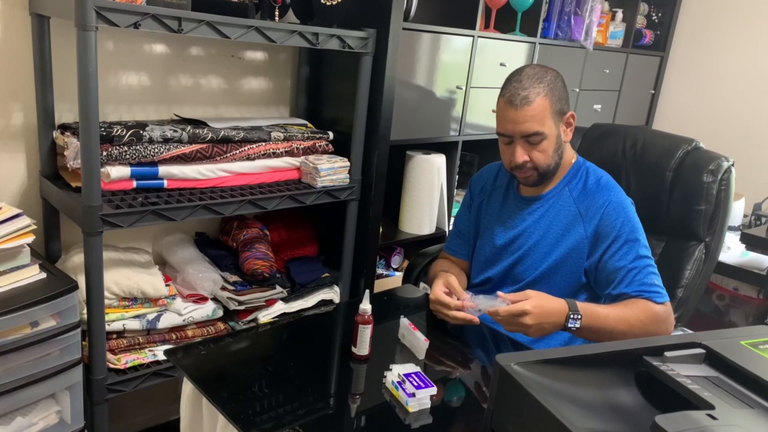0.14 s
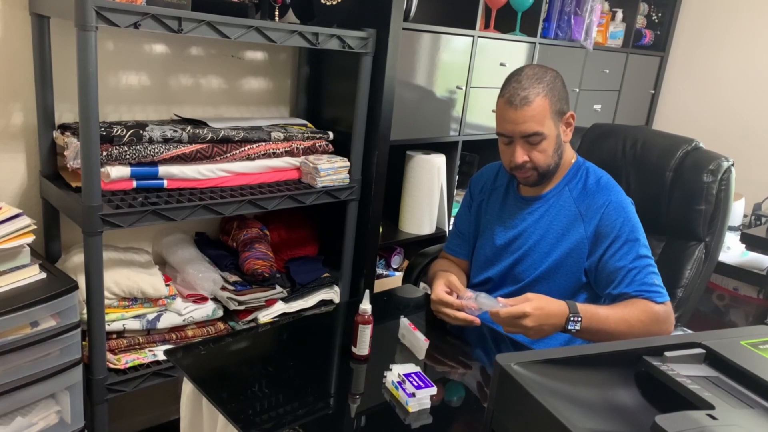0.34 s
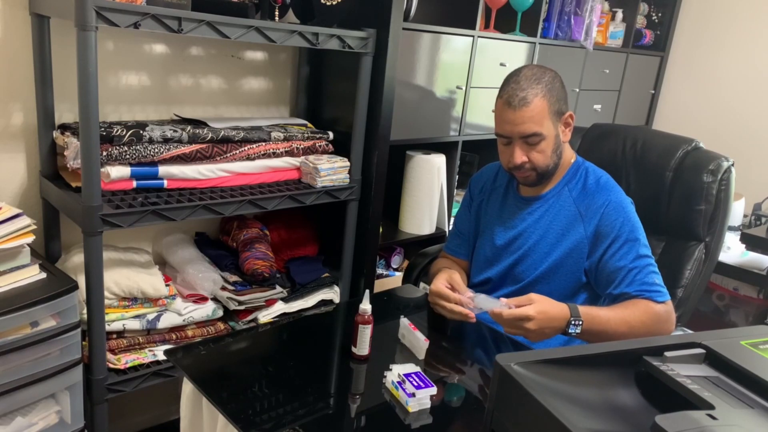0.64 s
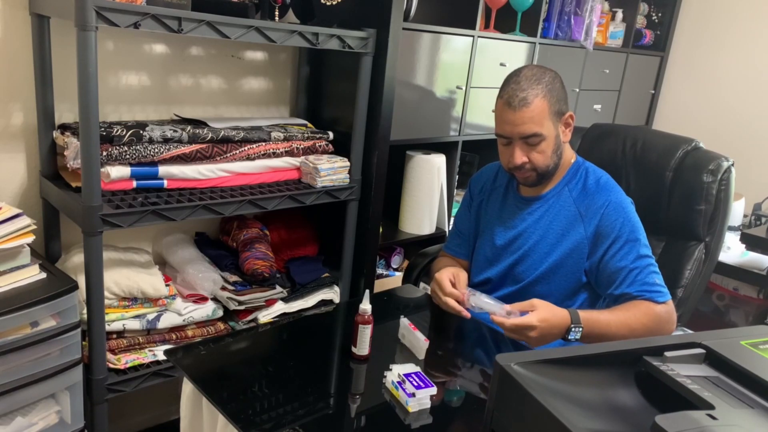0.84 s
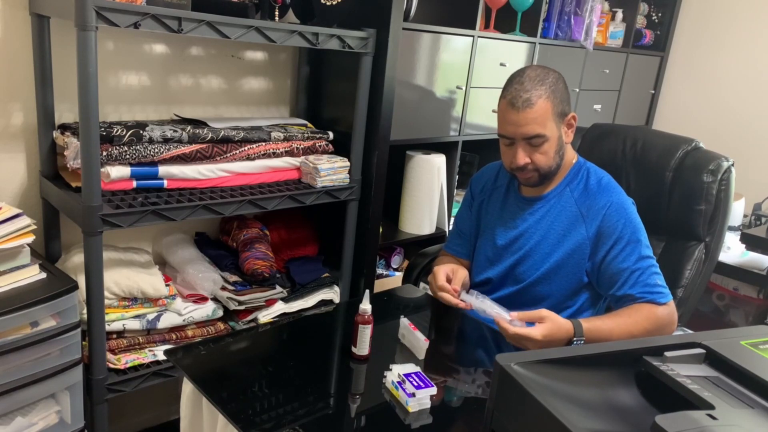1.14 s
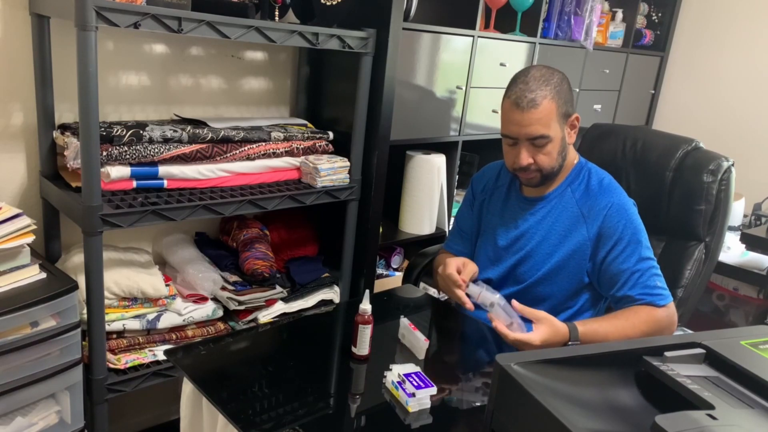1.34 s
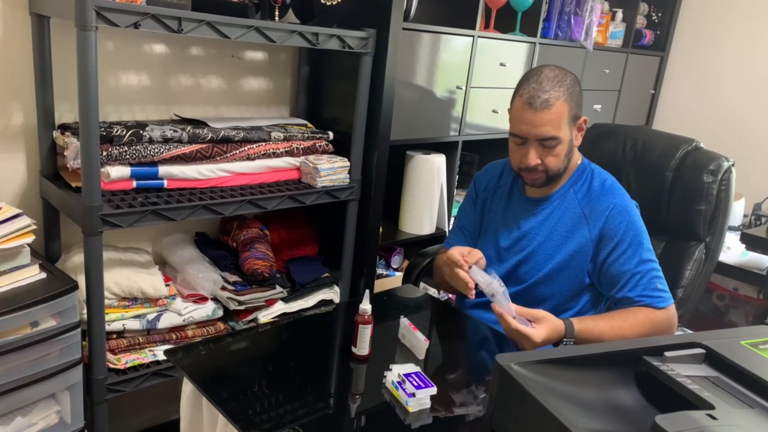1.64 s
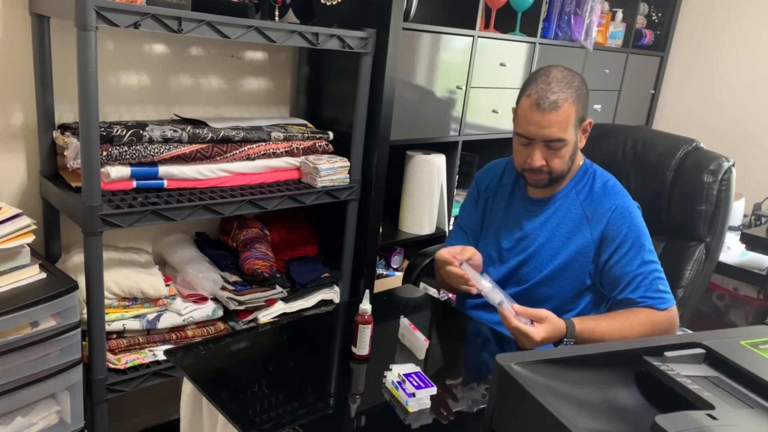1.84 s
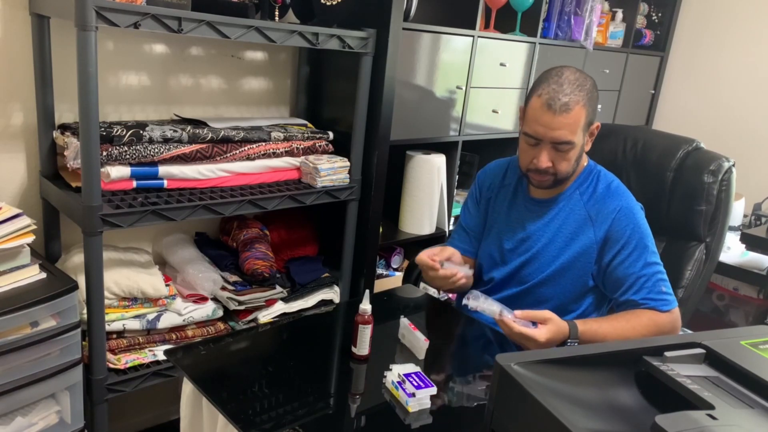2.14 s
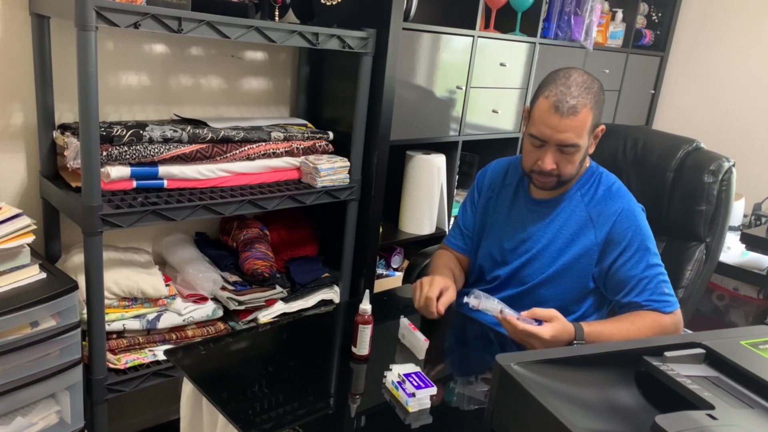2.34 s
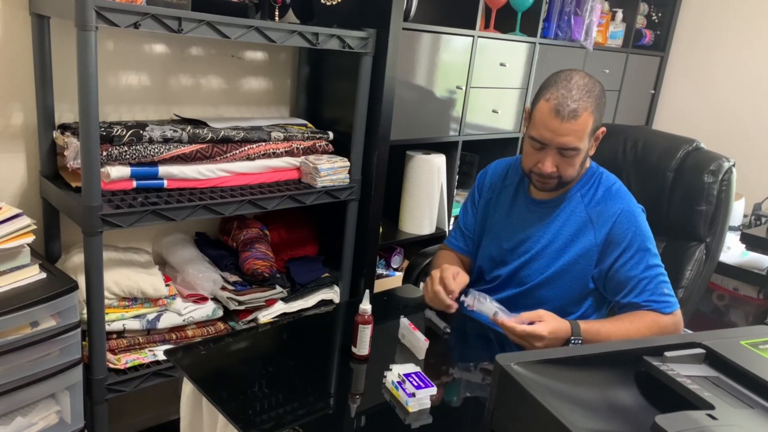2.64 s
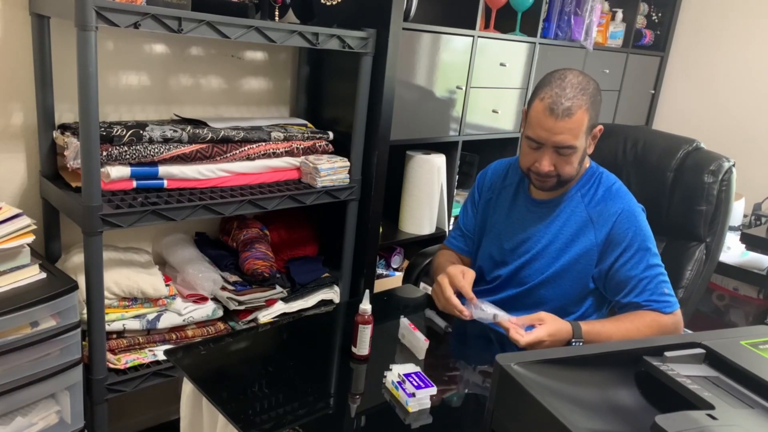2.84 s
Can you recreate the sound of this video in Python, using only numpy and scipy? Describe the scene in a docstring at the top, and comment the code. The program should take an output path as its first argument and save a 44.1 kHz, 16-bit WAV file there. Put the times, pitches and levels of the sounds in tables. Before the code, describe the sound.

A thin plastic pack crackles and ticks in the fingers, pauses briefly, then a small hard object drops and bounces on a desk amid louder rustling; small quiet room, low rumble, stereo microphone at moderate distance.

```python
"""A thin plastic pack is worked open between the fingers in a small quiet room, heard at two microphone ports.
From the start random creases crackle in the film over a dull body, with steady low rumble beneath.
Single creases snap out of the crackle: a coloured crack over a thud.
Soft desk contacts come past the middle; later a hard little object drops and bounces: cracks and ringing modes.
Early echoes and a noise tail answer pack and desk."""
import sys
import numpy as np
from scipy import signal
from scipy.fft import rfft, irfft, next_fast_len
from scipy.io import wavfile
from scipy.ndimage import map_coordinates

SR = 44100
rng = np.random.default_rng(int(sys.argv[2]) if len(sys.argv) > 2 else 0)


def attenuation_scalar(level_db):
    """Turn a level in dB into a linear amplitude multiplier (20 dB per decade)."""
    decades = np.asarray(level_db, float) / 20
    return 10 ** decades


def unload_audio(sound):
    """Save the sound as a 16-bit wav file, at the path given as the first command line argument."""
    columns = np.transpose(np.atleast_2d(sound))
    # keep every value between -1 and 1, then stretch to whole-number steps
    steps = np.round(np.clip(columns, -1, 1) * 32767)
    wavfile.write(sys.argv[1], SR, steps.astype(np.int16))


N = 132300  # samples, 3 s

# colour of the pack's dull body and thuds: f/Hz, relative density level/dB
BODY_COLOUR = [(120, -18), (170, -3), (260, -2.5), (400, -3), (700, -2.5), (1050, 2.5), (1500, -8),
               (2400, -5), (3300, -11.5), (5500, -120)]
CRACK_DELAY_S = 0.00093  # fixed delay from listed time to the crack


def unit(x):
    """Scaled to rms 1."""
    return x / np.sqrt(np.mean(x ** 2) + 1e-20)


def along(points, hz):
    """Interpolates (Hz, value) points on a log frequency axis."""
    f, value = np.transpose(points)
    return np.interp(np.log(hz + 1), np.log(f + 1), value)


def filtered(x, response):
    """x shaped by a complex response of frequency."""
    size = next_fast_len(x.shape[-1] + 8192)
    spectrum = rfft(x, size) * response(np.fft.rfftfreq(size, 1 / SR))
    return irfft(spectrum, size)[..., :x.shape[-1]]


def causal(colour):
    """Minimum-phase pulse of energy 1 with this colour, by folding the cepstrum."""
    level_db = along(colour, np.fft.rfftfreq(2048, 1 / SR))
    cepstrum = irfft(np.log(attenuation_scalar(level_db) + 1e-6))
    cepstrum[1:1024] *= 2
    cepstrum[1025:] = 0
    pulse = irfft(np.exp(rfft(cepstrum)))[:1024]
    return pulse / np.linalg.norm(pulse)


def pair(two, alike):
    """Two unrelated signals mixed to a left-right likeness that depends on frequency."""
    def mid_side_gains(hz):
        angle = np.arccos(np.clip(along(alike, hz), -1, 1)) / 2
        return np.array([np.cos(angle), np.sin(angle)])

    mid, side = filtered(two, mid_side_gains)
    return np.array([mid + side, mid - side])


def wobble(rate):
    """A smooth random curve, rate knots a second."""
    knots = rng.standard_normal(int(N * rate / SR) + 4)
    return map_coordinates(knots, [np.arange(N) * rate / SR])


def crease_colour(hz):
    """Small, high-pitched creases sound brighter than large ones, with a hump at their own pitch."""
    # colour of the film: f/Hz, relative density level/dB
    film_colour = [(880, -22.5), (1500, -7.5), (3280, 1), (4200, 0.5), (6000, -1), (7460, -9), (8900, -7),
                   (11000, -15), (13500, -18.5), (16000, -24)]
    brighter_db = 9  # dB per octave of colour, for each octave of pitch above 4 kHz
    peak_db, peak_octaves = 5.5, 0.14  # height and width of the hump
    f = np.geomspace(500, 16000, num=80)
    tilt_db = brighter_db * np.log2(hz / 4000) * np.log2(f / 4000)
    hump_db = peak_db * np.exp(-.5 * (np.log2(f / hz) / peak_octaves) ** 2)
    return np.transpose([f, along(film_colour, f) + tilt_db + hump_db])


def crackle():
    """Creases of many sizes flip at random, in clumps, and the pack shifts dully in the hand."""
    # handling of the pack: t/s, film crackle level/dB, dull body over the film/dB
    handling = [(0, -54.5, -14), (0.088, -77, 6.5), (0.149, -54.5, -5.5), (.22, -72.5, -1),
                (.29, -63.5, -1.5), (.4, -64.5, -3), (.49, -78, 7), (.55, -68.5, 7.5), (.6, -58, -9),
                (.77, -61, -4), (.89, -56, -7.5), (.97, -56, -11.5), (1.1, -58.5, 1), (1.18, -51.5, -18.5),
                (1.3, -59.5, -4.5), (1.389, -59, -2), (1.47, -61.5, -11), (1.602, -57, -2),
                (1.69, -56.5, -5), (1.82, -65, -3), (1.84, -54, -4), (1.875, -49.5, -3), (1.91, -49, -19),
                (1.979, -68.5, -9), (2.12, -78, 8), (2.21, -69.5, -8.5), (2.27, -89, -10), (2.33, -81, 3.5),
                (2.378, -59.5, -0.5), (2.389, -42.5, -9), (2.44, -49, 3), (2.55, -45.5, -19.5),
                (2.62, -54.5, -6.5), (2.72, -61.5, -3.5), (2.77, -50, -7), (2.83, -55.5, -11),
                (2.93, -78, -5.5), (3, -64, -1)]
    # pitch of creases from large to small: f/Hz
    crease_pitches = [2300, 2850, 3600, 4400, 5300, 6500, 8400, 10250]
    creases_per_s, crease_spread_db, clump_db = 220, 4.2, 2.5  # creases per pitch; spread is exponential
    s, level_db, body_db = np.transpose(handling)
    t = np.arange(N) / SR
    chance, size_draw, sign_draw = rng.random((3, len(crease_pitches) + 1, N))
    size = attenuation_scalar(-crease_spread_db * np.log(size_draw + .025))
    *flips, thuds = (chance < creases_per_s / SR) * size * np.sign(sign_draw - .5)
    film = np.zeros(N)
    for flip, hz in zip(flips, crease_pitches):
        creases = signal.fftconvolve(flip, causal(crease_colour(hz)))[:N]
        film += creases * attenuation_scalar(clump_db * wobble(24.8))
    body = unit(signal.fftconvolve(thuds, causal(BODY_COLOUR))[:N])
    body *= attenuation_scalar(np.interp(t, s, body_db) + clump_db * wobble(17.57))
    return attenuation_scalar(np.interp(t, s, level_db)) * (unit(film) + body)


def rumble():
    """Steady low room noise and faint hiss, shaped from white noise."""
    # colour of the room noise: f/Hz, relative density level/dB
    rumble_colour = [(15, -56), (28, -24), (36, -11), (45, -0.5), (60, -8.5), (120, -3.5), (190, -16.5),
                     (263, -0.5), (335, -10.5), (463, -9.5), (714, -23.5), (2000, -32.5), (4250, -22),
                     (9000, -61), (15000, -62.5), (16500, -67)]
    # stereo width of the room noise: f/Hz, left-right likeness (1 = same)
    rumble_alike = [(40, 0.72), (200, 0.9), (600, 0.14), (5000, 0.39), (7500, .97)]
    noise = filtered(rng.standard_normal((2, N)), lambda hz: attenuation_scalar(along(rumble_colour, hz)))
    level_db = -66 + 0.27 * wobble(1.5)
    return attenuation_scalar(level_db) * unit(pair(noise, rumble_alike))


def burst(t60, colour):
    """One sharp push and a dying puff of noise (t60 in s) in one colour, peak 1."""
    t = np.arange(2048) / SR
    puff = .16 * rng.standard_normal(len(t)) * attenuation_scalar(-60 * t / t60)
    push = (t == 0) + puff
    b = np.convolve(push, causal(colour))[:len(t)]
    return b / np.abs(b).max()


def snaps():
    """A single crease gives way: a crack coloured by the crease's pitch over a dull thud."""
    # creases that snap: t/s, shortly before the crack; crack peak level/dB, dull body over it/dB, pitch f/Hz
    snap_events = [(0.1079, -37.5, -2.5, 6500), (0.1325, -32, -28, 7100), (0.2495, -40, -4, 3600),
                   (0.3044, -34.5, -19, 6500), (0.3364, -31, -14, 3970), (0.589, -43, -12, 6000),
                   (0.6058, -28.5, -30.5, 9800), (0.638, -36, -34, 4500), (0.6993, -32.5, -17, 4400),
                   (0.7229, -25, -37, 9400), (0.7324, -34, -39, 9600), (0.7925, -36.5, -28, 4600),
                   (0.8577, -30, -35, 8400), (0.866, -34, -18, 4200), (0.8832, -38, -16, 3560),
                   (0.96, -36, -20, 3600), (0.99, -34.5, -30, 4170), (1.053, -34, -15, 8300),
                   (1.0843, -35, -8.5, 3960), (1.1766, -32, -9, 8400), (1.223, -48, -27, 7500),
                   (1.4108, -37, -15, 3300), (1.476, -46, -33, 2560), (1.496, -27, -35, 7100),
                   (1.5047, -50, -5.5, 6560), (1.5942, -43, -4, 3490), (1.8394, -32.5, -2, 4670),
                   (1.8624, -31.5, -6.5, 2800), (1.879, -30, -28, 8900), (2.1067, -44, -12, 4970),
                   (2.194, -46.5, -10.5, 5000), (2.63, -28.5, -25, 9100), (2.694, -31, -21, 8400),
                   (2.7586, -34.5, -7.5, 3850), (2.9864, -39.5, -25, 5000)]
    out = np.zeros(N + SR)
    for s, db, body_db, hz in snap_events:
        crack = burst(0.006, crease_colour(hz))
        thud = attenuation_scalar(body_db) * burst(0.021, BODY_COLOUR)
        start = round((s + CRACK_DELAY_S) * SR)
        out[start:][:len(crack)] += attenuation_scalar(db) * (crack + thud)
    return out[:N]


def knocks():
    """Contacts on the desk top crack and ring its modes; each has its own level and brightness."""
    # contacts with the desk: t/s, shortly before the crack; crack peak level/dB, brightness/(dB per octave)
    knock_events = [(1.86, -31, -2), (1.893, -35, -1), (1.869, -35, -0.5), (2.384, -18.5, 0.5),
                    (2.4326, -27.5, 1.5), (2.434, -7, 1.5), (2.452, -28, -9), (2.467, -30, -4),
                    (2.501, -15, -1.5), (2.519, -26, -3.5), (2.533, -29.5, 7), (2.558, -32.5, 2.5)]
    # colour of the crack on the desk: f/Hz, relative density level/dB
    desk_colour = [(59, -57), (110, -31.5), (200, -29.5), (290, -9.5), (481, 2), (621, -4), (850, 5),
                   (1300, -5.5), (1800, 12.5), (2500, 4), (3200, 3), (4200, 0.5), (5530, -11), (9020, -5.5),
                   (11500, -12.5), (13800, -15), (16000, -25)]
    # modes of the struck top: f/Hz, relative level/dB, t60/s
    desk_modes = [(483, -22.5, 0.053), (991, -4, 0.033), (1269, -2, 0.05), (1540, -4.5, 0.038),
                  (2066, -5, 0.042), (2454, -6, .035), (2873, -3, 0.038), (3166, -10, 0.026),
                  (3537, -10, 0.016), (4050, -1, 0.016)]
    ring_db, ring_scatter_db = -14, 3  # ring against crack; random spread of each mode
    out, t = np.zeros(N + SR), np.arange(SR // 10) / SR
    for s, db, tilt_db in knock_events:
        crack = burst(0.005, [(f, g + tilt_db * np.log2(f / 2000)) for f, g in desk_colour])
        ring = np.zeros(len(t))
        for f, g, t60 in desk_modes:
            mode_db = g + tilt_db * np.log2(f / 2000) + ring_scatter_db * rng.standard_normal()
            ring += attenuation_scalar(mode_db - 60 * t / t60) * rng.choice([-1, 1]) * np.sin(2 * np.pi * f * t)
        ring *= 1 - np.exp(-t / 0.0004)  # soft onset
        start = round((s + CRACK_DELAY_S) * SR)
        out[start:][:len(crack)] += attenuation_scalar(db) * crack
        out[start:][:len(t)] += attenuation_scalar(db + ring_db) * ring
    return out[:N]


def in_room(x, wet_db):
    """Direct sound and early echoes at both ports, plus a noise tail drawn anew for every tenth of a second."""
    # early echoes off the walls: delay t/s, level/dB
    wall_echoes = [(.004, -25), (.0065, -12), (.0095, -13), (0.013, -16), (.019, -22)]
    # decay of the tail: f/Hz, t60/s
    room_decay = [(150, 0.2), (1000, 0.39), (3000, 0.42), (7000, .28), (14000, 0.14)]
    # stereo width of the tail: f/Hz, left-right likeness (1 = same)
    room_alike = [(100, 1), (500, 0.077), (1500, 0.04), (5000, 0.12), (7500, 0.19), (16000, 1)]
    near = x.copy()
    for s, db in wall_echoes:
        near += attenuation_scalar(db) * np.pad(x, (round(s * SR), 0))[:N]
    out = np.pad([near, near], ((0, 0), (0, SR)))
    step = SR // 10
    for start in range(0, N, step):
        hz, t, z = signal.stft(rng.standard_normal((2, SR // 2)), SR, nperseg=256)
        decay = attenuation_scalar(-60 * t / along(room_decay, hz)[:, None])
        tail = pair(signal.istft(z * decay, SR, nperseg=256)[1], room_alike)
        tail *= np.clip(np.arange(tail.shape[1]) / (0.002 * SR), 0, 1)  # fades in over 2 ms
        tail *= attenuation_scalar(wet_db) / np.linalg.norm(tail[0])
        wet = signal.fftconvolve(x[None, start:start + step], tail, axes=1)
        out[:, start:start + wet.shape[1]] += wet
    return out[:, :N]


def scene():
    """Pack and desk in the room, each with its own tail level in dB, over the rumble."""
    pack = in_room(crackle(), 2) + in_room(snaps(), 1.5)
    desk = in_room(knocks(), 1)
    return pack + desk + rumble()


def band_limit(x):
    """A steep low-pass at the top of the band."""
    return signal.sosfilt(signal.butter(12, 16500, fs=SR, output="sos"), x)


def record(dry):
    """Two microphone ports a little apart shift the phase between the sides."""
    # phase between the ports: f/Hz, lead of the left/rad
    port_lead = [(0, 0), (1290, .5), (2070, 4), (4200, 6.3), (5700, 9.4), (6700, 11), (7500, 14.6),
                 (16300, 3.14), (22050, 0)]

    def port_phase(hz):
        lead = np.interp(hz, *np.transpose(port_lead))
        return np.exp(.5j * np.outer([1, -1], lead))  # half the lead to each side

    ports = filtered(dry, port_phase)
    return band_limit(ports)


dry = scene()
out = record(dry)
unload_audio(out)
```